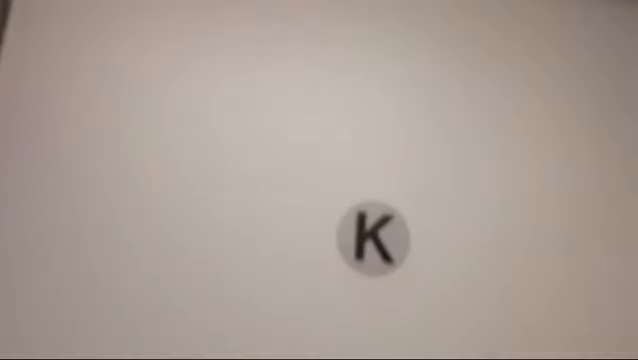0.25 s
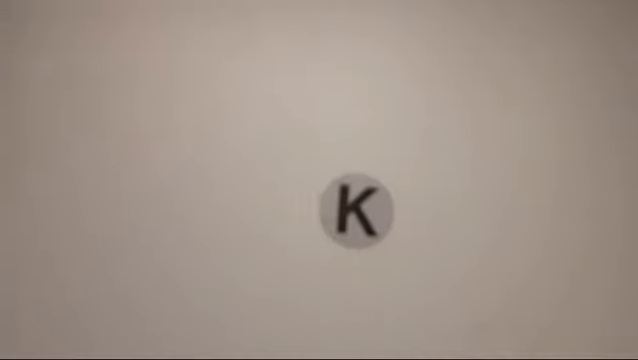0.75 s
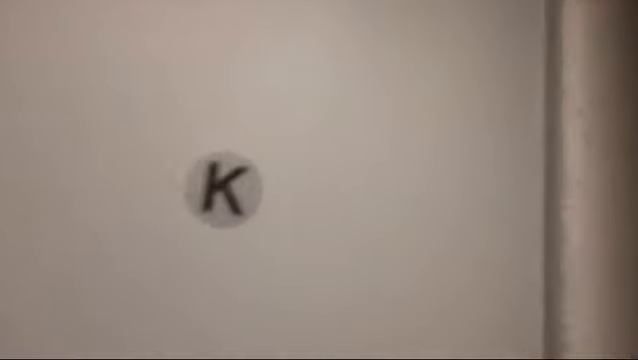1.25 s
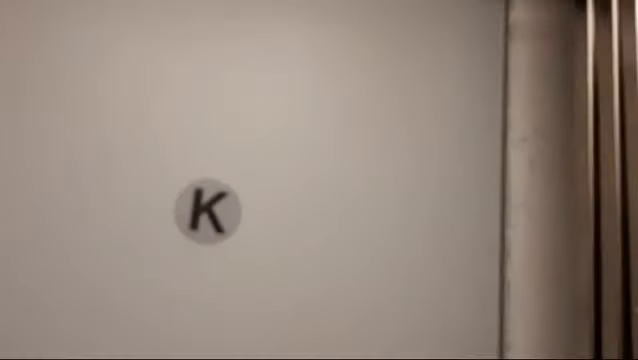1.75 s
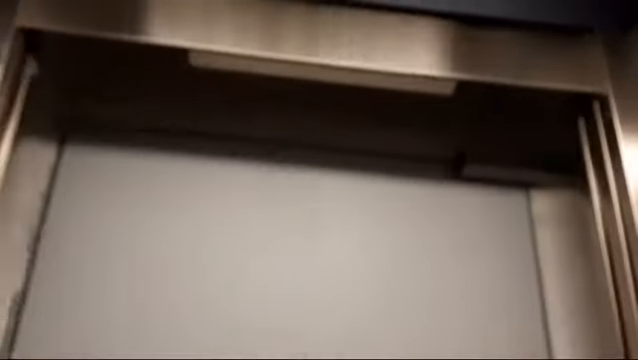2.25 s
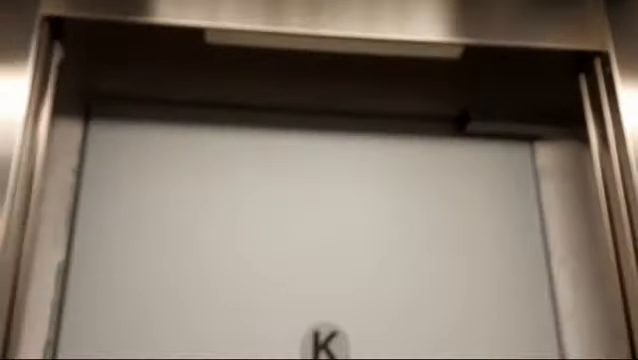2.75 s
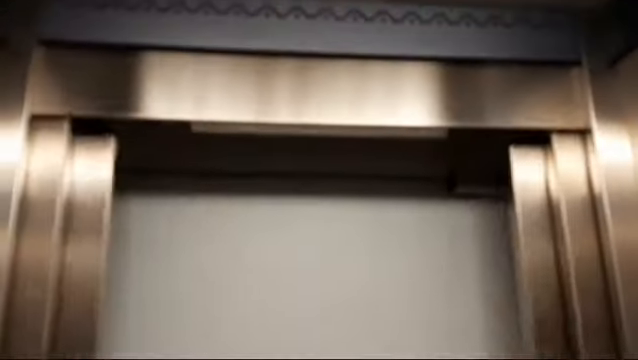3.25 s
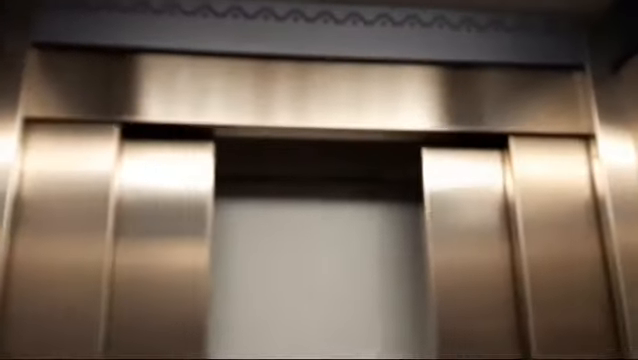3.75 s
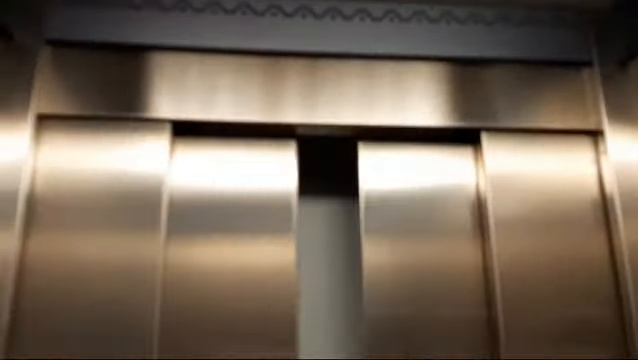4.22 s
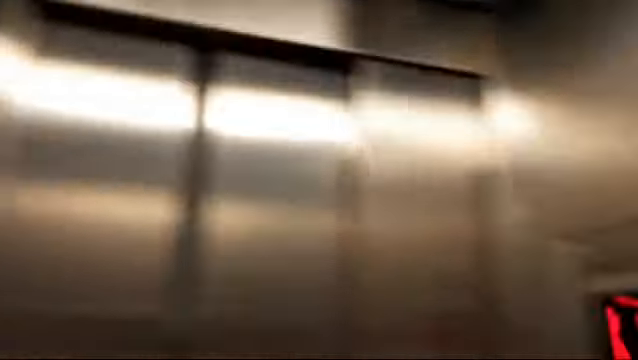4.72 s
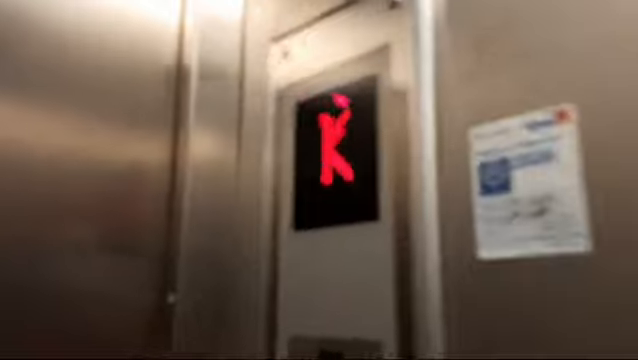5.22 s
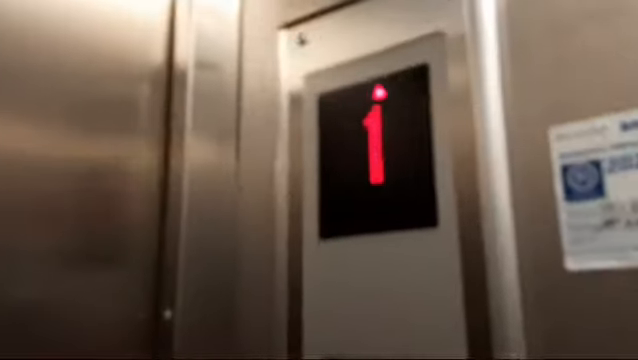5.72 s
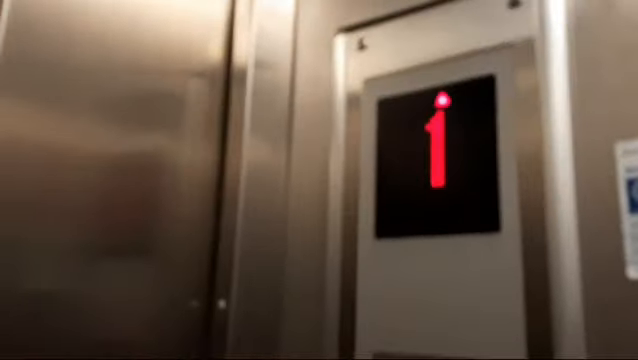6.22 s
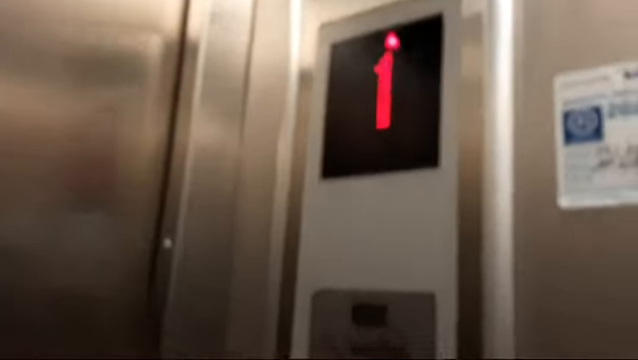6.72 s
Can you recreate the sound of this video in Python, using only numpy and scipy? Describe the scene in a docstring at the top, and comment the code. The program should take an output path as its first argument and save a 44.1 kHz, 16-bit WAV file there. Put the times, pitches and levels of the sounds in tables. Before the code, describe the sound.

Close cloth rustling and small handling taps sit over the steady air hum of a small elevator car. After a short squeak and several heavy thuds, the metal doors grind shut nearby with hollow knocks and little chirps. Low rumbling then surrounds the hand-held microphone as the car gets moving, with two latch clacks, the second louder and ringing, and a faint motor hum.

```python
"""Inside a small steel elevator car, on a hand-held device with two microphone ports 17 cm apart.
First the ventilation hums while, right at the microphone, sleeves rustle and fingers tick on the case.
A rubbing squeak and a run of thuds lead into the door drive; a step away, the sliding panels knock,
roll shut and meet. Then the car shudders all around, the hoist motor hums through the walls,
a latch clacks twice and the low running noise sets in."""
import sys
import numpy as np
from scipy import signal
from scipy.fft import rfft, irfft
from scipy.io import wavfile
from scipy.ndimage import uniform_filter1d

SR = 44100
rng = np.random.default_rng(int(sys.argv[2]) if len(sys.argv) > 2 else 0)


def master(y):
    """Save y as 16-bit WAV."""
    cut = np.clip(np.atleast_2d(y).T, -1, 1)
    pcm = np.round(cut * 32767)  # scale
    wavfile.write(sys.argv[1], SR, pcm.astype(np.int16))


N = 307818
TIME = np.arange(N) / SR
HZ = np.maximum(np.fft.rfftfreq(N, 1 / SR), 1)


def from_db(db):
    """Decibels to gain."""
    return 10 ** (np.asarray(db) / 20)


def rms_one(x):
    """Scale to unit power."""
    return x / np.sqrt(np.mean(x ** 2) + 1e-20)


def gains(rows):
    """One smoothed gain curve for each dB column, silent outside the rows."""
    s, *columns = np.transpose(rows)
    inside = (TIME > s[0] - .03) & (TIME < s[-1] + .03)
    return [uniform_filter1d(inside * from_db(np.interp(TIME, s, db)), size=441) for db in columns]


def swell(s, rise, fall, shape=1.72):
    """A rounded rise to 1 at time s, and a fall."""
    distance = np.abs(TIME - s) / np.where(TIME < s, rise, fall)
    return np.exp(-np.minimum(distance, 8) ** shape)


def swells(rows):
    """One gain curve for each dB column; overlapping swells add in power."""
    return np.sqrt(sum(np.outer(from_db(db), swell(s, rise, fall)) ** 2 for s, rise, fall, *db in rows))


def colour(points, resonances=()):
    """A spectrum through (Hz, dB) points with (Hz, width Hz, dB) peaks, rolled off at both ends."""
    hz, db = np.transpose(points)
    peaks = sum(lift / (1 + (2 * (HZ - centre) / width) ** 2) for centre, width, lift in resonances)
    roll_off = np.hypot(1, (0.68 * hz[0] / HZ) ** 4) * np.hypot(1, (0.5 * HZ / hz[-1]) ** 4)
    return from_db(np.interp(np.log(HZ), np.log(hz), db) + peaks) / roll_off


def flutter(rate_hz, depth_db):
    """A gain that wanders at random."""
    drift = irfft(rfft(rng.standard_normal(N)) / (1 + (HZ / rate_hz) ** 2), N)
    return from_db(depth_db * rms_one(drift))


def diffuse(shape, port_gap_m=0.17):
    """Noise that reaches the two ports from all walls: alike in the bass, unrelated in the treble."""
    alike = .997 * np.sinc(2 * HZ * port_gap_m / 343)
    mid, side = rfft(rng.standard_normal((2, N))) * shape
    mid, side = irfft(mid * np.sqrt(1 + alike), N), irfft(side * np.sqrt(1 - alike), N)
    return (mid + side * np.array([[1], [-1]])) / np.std(mid)


def pan(db):
    """Port gains for a level difference, left minus right."""
    sides = from_db(np.array([[db], [-db]]) / 2)
    return sides / sides.mean()


def clicks(times, levels_db):
    """One impulse for each contact."""
    out = np.zeros(N)
    out[(np.asarray(times) * SR).astype(int)] = from_db(levels_db)
    return out


def ring(force, hz, t60):
    """A unit impulse sets a sine of height 1 ringing."""
    r, w = from_db(-60 / (t60 * SR)), 2 * np.pi * hz / SR
    return signal.lfilter([0, np.sin(w)], [1, -2 * r * np.cos(w), r * r], force + 1e-18)


def burst(s, rise, t60):
    """The envelope of reflections that build up in the car, then die away."""
    age = np.maximum(TIME - s, 0)
    return np.minimum(age / rise, 1) * from_db(-60 * np.clip((age - rise) / t60, 0, 3))


# air in the still car: (frequency [Hz], level [dB])
AIR_COLOUR = [(27, -29), (38, -9.5), (56, -8.5), (78, -8), (120, -24.5), (190, -26), (280, -21.5),
              (560, -52), (1500, -34), (3200, -73), (5000, -34), (8000, -36.5), (12000, -35), (16000, -39)]
# resonances of the hum, shared by wall drone and brushing cloth: (frequency [Hz], width [Hz], lift [dB])
HUM_PEAKS = [(52, 13, 3.3), (237, 7.6, 11.2), (306.3, 14.7, 9.6), (1503, 98, 7.8), (2050, 55, 8.8)]
def ventilation(level_db=-57):
    """Room tone: steady ventilation hums all around the microphone."""
    return from_db(level_db) * diffuse(colour(AIR_COLOUR, HUM_PEAKS))


# strokes of cloth: (peak time [s], rise [s], fall [s], swish [dB], brush [dB])
SLEEVE_STROKES = [(.08, 0.24, 0.17, -50.5, -56.5), (.168, 0.017, 0.022, -45, -62),
                  (.57, 0.17, 0.18, -60, -71), (.92, 0.027, 0.079, -67, -69.5),
                  (1.22, 0.078, 0.046, -63.5, -77), (1.605, 0.039, 0.083, -50.5, -49),
                  (1.73, 0.046, 0.055, -42.5, -50.5), (1.8, 0.032, 0.038, -45.5, -48.5),
                  (1.915, 0.04, 0.036, -36, -45), (2.08, 0.41, 0.23, -52, -55.5),
                  (2.328, 0.054, 0.055, -35, -39.5), (4.72, 0.054, 0.15, -44, -50),
                  (4.9, 0.085, 0.086, -46, -55), (5.09, 0.18, 0.12, -47.5, -46.5),
                  (5.29, 0.028, 0.054, -43, -48.5), (5.49, 0.0097, 0.045, -35, -54),
                  (5.8, 0.43, .14, -55, -57.5), (6.14, 0.15, 0.12, -46.5, -51.5),
                  (6.92, 0.22, 0.32, -67, -63)]
# faint sliding that never stops: (time [s], level [dB])
SLEEVE_SLIDING = [(0, -63), (.82, -71), (1.35, -68), (1.55, -64.5), (2.5, -53), (4.55, -58.5),
                  (5.42, -63.5), (6.35, -64), (6.55, -61), (6.98, -57)]
# bright swish and dull brushing: (frequency [Hz], level [dB])
SWISH_COLOUR = [(1200, -13), (2500, -7), (4200, -2), (6000, -3.5), (8000, -5.5), (11000, -6),
                (16000, -16.5)]
BRUSH_COLOUR = [(150, -17), (350, -1.5), (700, 0), (1100, -1.5), (2000, -4), (3000, -5), (5000, -9)]
def sleeves(swish_db=1.0, brush_db=2.5, faint_brush_db=-11.0):
    """Cloth slides on cloth close to the microphone: a grainy swish and a duller brushing."""
    swish, brush = swells(SLEEVE_STROKES)
    faint, = gains(SLEEVE_SLIDING)
    swish = from_db(swish_db) * np.hypot(swish, faint)
    brush = from_db(brush_db) * np.hypot(brush, from_db(faint_brush_db) * faint)
    grain = diffuse(colour(SWISH_COLOUR)) * flutter(rate_hz=120, depth_db=1.0)
    return swish * grain + brush * diffuse(colour(BRUSH_COLOUR, HUM_PEAKS))


# shifts of the hand: (peak time [s], rise [s], fall [s], level [dB])
GRIP_SHIFTS = [(.04, .1, 0.15, -48), (.22, .07, 0.14, -49.5), (.62, 0.067, 0.036, -54.5)]
def grip():
    """Handling noise: the hand shifts on the case, a dull, lumpy rubbing, different at each port."""
    level, = swells(GRIP_SHIFTS)
    shape = colour([(60, 5), (150, 2), (300, 0.5), (500, -12), (1500, -17.5), (3000, -20.5)])
    rubbing = rms_one(irfft(rfft(rng.standard_normal((2, N))) * shape, N))
    return level * rubbing * flutter(rate_hz=34, depth_db=3.5) * pan(4.4)


# ticks of the case: (time [s], left minus right [dB], level [dB], brightness [dB per band])
CASE_TICKS = [(.043, -13, -44, -6), (.1676, 16, -37, 13), (.183, -11, -37.5, -3), (.214, 5, -38, -2),
              (.24, 10, -35, -6), (.2655, 9, -35, -1), (0.31, 7, -38, -2), (.352, -13, -47, -11),
              (.424, -22, -41, -4), (.626, 14, -33, 0.5), (.69, 12, -48, 6), (.741, 12, -41, 5.5),
              (1.0575, 25, -39, 0.5), (1.074, 12, -44, 0), (2.096, 8, -27, -1.5), (2.128, 7, -34, -5),
              (4.179, -4, -32, 4), (4.2917, -12, -24, 0), (4.443, -8, -40, 1)]
# bands of a tick: (low edge [Hz], high edge [Hz], level [dB])
TICK_BANDS = [(587, 1620, -4), (2540, 9600, 3.5), (7660, 13700, 0)]
def case_ticks(crackle=0.24, crackle_t60=0.011):
    """The case around the microphone creaks in dry ticks, each a snap and a trace of crackle."""
    out = np.zeros((2, N))
    age = TIME[:SR // 50]
    for s, side_db, db, bright_db in CASE_TICKS:
        force = (age == 0) + crackle * rng.standard_normal((2, len(age))) * from_db(-60 * age / crackle_t60)
        at = int(s * SR)
        for k, (low, high, band_db) in enumerate(TICK_BANDS):
            band = signal.butter(2, [low, high], "band", fs=SR, output="sos")
            tick = (-1) ** k * signal.sosfilt(band, force)   # alternating signs let adjacent bands add
            level = from_db(db + band_db + bright_db * (k - 1)) * pan(side_db)
            out[:, at:at + len(age)] += level * tick / np.abs(tick).max()
    return out


# fingertips on the case: (time [s], level [dB])
FINGER_TAPS = [(0.122, -37.5), (0.141, -42), (0.167, -33.5), (0.237, -45), (0.291, -42.5), (0.322, -40.5),
               (0.348, -39), (0.381, -38), (0.386, -43), (0.41, -37), (0.415, -42), (0.548, -41.5),
               (0.623, -46), (0.69, -39), (0.74, -32.5), (1.074, -40), (1.644, -28), (1.691, -29),
               (2.692, -32.5), (2.778, -32), (2.847, -41)]
def fingers(start_hz=680, end_hz=230, tap_s=0.0055):
    """Soft taps right beside the left port, each a brief falling blip."""
    progress = np.linspace(0, 1, int(tap_s * SR))
    hz = start_hz * (end_hz / start_hz) ** progress
    blip = -np.sin(2 * np.pi * np.cumsum(hz) / SR) * np.sin(np.pi * progress ** 0.81) ** 2
    return np.convolve(clicks(*np.transpose(FINGER_TAPS)), blip)[:N] * pan(26.0)


# the car sways on its ropes: (peak time [s], rise [s], fall [s], rumble [dB], drone [dB])
SHUDDERS = [(1.65, 0.046, .07, -41, -57), (2.02, 0.12, 0.29, -29, -36), (2.58, 0.042, 0.058, -56, -41),
            (2.9, 0.21, 0.23, -56, -38), (4.07, .08, 0.12, -30.5, -40.5), (4.78, .1, 0.22, -40.5, -52.5),
            (5.08, 0.064, 0.19, -38, -41.5), (5.52, 0.039, 0.088, -32, -41), (6.16, 0.048, 0.084, -66, -48)]
# deep rumble and wall drone: (frequency [Hz], level [dB])
RUMBLE_COLOUR = [(25, -37), (33, 5.5), (45, 1), (65, 9), (86, 2.5), (105, -6), (135, -10), (250, -38)]
DRONE_COLOUR = [(90, -33), (140, -13.5), (190, -1.5), (300, -5), (420, -5.5), (800, -23.5)]
def walls(rumble_db=-1.0, drone_db=-4.5):
    """The walls rumble and drone on every side, shaken by each shudder and by the moving doors."""
    rumble, drone = swells(SHUDDERS)
    rumble = from_db(rumble_db) * np.hypot(rumble, door_driven(-30, steepness=1))
    drone = from_db(drone_db) * np.hypot(drone, door_driven(-42.5, steepness=0.81))
    low = rumble * diffuse(colour(RUMBLE_COLOUR, [(87.5, 66, 5.3)]))
    return low + drone * diffuse(colour(DRONE_COLOUR, HUM_PEAKS)) * pan(1.0)


# slips of the squeak, each a step higher: (peak time [s], pitch [Hz], level [dB], octave level [dB])
SQUEAK_SLIPS = [(1.743, 5130, -49, -43), (1.806, 5600, -36, -43), (1.834, 5670, -36.5, -33),
                (1.874, 5740, -40, -42)]
def squeak(rise_s=0.026, fall_s=0.016, glide_hz_per_s=300, waver=.001, scratch_db=-14.0):
    """Stick-slip whistle: each slip glides up on the left, its octave on the right, fringed by scratch."""
    wobble = 1 + waver * np.log(flutter(rate_hz=400, depth_db=5.5))
    tone, level = 0, 0
    for s, hz, db, octave_db in SQUEAK_SLIPS:
        slip = swell(s, rise_s, fall_s)
        phase = 2 * np.pi * np.cumsum((hz + glide_hz_per_s * (TIME - s)) * wobble) / SR
        fundamental = from_db(db) * np.sin(phase) * pan(18.0)
        octave = from_db(octave_db) * np.sin(2 * phase) * pan(-10.0)
        tone += slip * (fundamental + octave)
        level += from_db(db) * slip
    scratch = from_db(scratch_db) * level * diffuse(colour([(5500, 0), (7500, 0)], [(5600, 350, 14)]))
    return np.sqrt(2) * tone * flutter(rate_hz=97, depth_db=2.8) + scratch


# blows on the frame: (time [s], level [dB], hardness [dB])
FRAME_THUDS = [(1.867, -17, -1.5), (1.981, -17.5, -1), (2.054, -20, -1), (2.115, -20, -3),
               (2.152, -26.5, -12), (3.441, -22.5, -14), (4.332, -29, -20), (4.494, -29, -8.5),
               (4.914, -33, -15), (5.479, -26, -6.5), (5.911, -27.5, -10), (6.146, -34, 1.5)]
# modes of the cabin: (frequency [Hz], level [dB], t60 [s])
CABIN_MODES = [(49.4, -13, 0.53), (86.5, 0, 0.18), (96, 3, 0.04), (146, -15.5, 0.09), (239.9, -14, 0.3),
               (301.6, -16, 0.18), (426, -16.5, 0.07), (595, -35, 0.09)]
def thuds(contact_hz=700, clatter_db=-17.0, clatter_t60=0.17):
    """Blows ring the cabin around the microphone; hard ones reach its upper modes and clatter the walls."""
    s, db, hard_db = np.transpose(FRAME_THUDS)
    boom = 0
    for hz, mode_db, t60 in CABIN_MODES:
        force = clicks(s, db + mode_db + hard_db * (hz > 140))
        swell_s = 0.0069 * 86 / hz   # lower modes take longer to swell
        boom += ring(force, hz, t60) - ring(force, hz, swell_s * np.log(1000))
    blows = sum(from_db(db + hard + clatter_db) * burst(s, 0.001, clatter_t60)
                for s, db, hard in FRAME_THUDS)
    clatter = blows * diffuse(colour([(170, 12), (330, -10), (600, 2), (1000, -8), (2500, -10)]))
    soft_contact = signal.butter(1, contact_hz, fs=SR, output="sos")
    return clatter + signal.sosfilt(soft_contact, -2 * boom)


# the doors set off, run and brake: (time [s], speed [dB re full speed])
DOOR_SPEED = [(2.45, -24), (2.56, -14), (2.8, -8), (3.0, -4), (3.4, 0), (4.1, -0.5), (4.35, -8),
              (4.48, -16), (4.68, -13.5)]
def door_driven(full_speed_db, steepness):
    """A gain that follows the speed of the doors by a power law."""
    speed, = gains(DOOR_SPEED)
    return from_db(full_speed_db) * np.maximum(speed, 0) ** steepness


# resonances of the steel door panels: (frequency [Hz], width [Hz], lift [dB])
PANEL_MODES = [(160, 41, 11.5), (330, 5.5, 1.5), (382, 7.1, 10.5), (434, 6.5, 8), (525.5, 7.5, 13.5),
               (660, 56, 9), (732, 8.3, 15), (765, 6.6, 9), (851, 32, 3.5), (1000, 15, 6), (1224, 16, 4.5),
               (1533, 23, 12.5), (2050, 15, 12.5)]
# grinding rollers and sliding guide shoes: (frequency [Hz], level [dB])
ROLLER_COLOUR = [(150, 5), (280, -7), (420, 1), (700, -5), (1000, 0.5), (1600, -2.5), (2300, -4.5),
                 (3300, -9.5), (6000, -22)]
SHOE_COLOUR = [(2500, -5), (3800, -2.5), (5200, -1.5), (7500, -3.5), (10500, -6), (13000, -6),
               (16000, -16.5)]
# tones of the door drive at full speed: (frequency [Hz], level [dB])
DRIVE_TONES = [(668, -56.5), (1240, -53.5)]
# the guide shoes bind and hiss louder: (peak time [s], rise [s], fall [s], level [dB])
SHOE_SCUFFS = [(2.7, .15, 0.047, -47), (3.08, 0.3, 0.24, -40), (3.63, 0.017, 0.018, -47),
               (4.185, 0.0083, 0.03, -39), (4.37, 0.023, 0.022, -51)]
def rolling_doors(whine_width_hz=24, scuff_treble_db=-6.5):
    """A step away, rollers grind through the panels, the drive whines and guide shoes hiss and scuff."""
    grind = door_driven(-41, steepness=0.85) * flutter(rate_hz=17, depth_db=2.0)
    grind = grind * diffuse(colour(ROLLER_COLOUR, PANEL_MODES))
    whine = sum(door_driven(db, steepness=1.4) * diffuse(1 / (1 + ((HZ - hz) / whine_width_hz) ** 2))
                for hz, db in DRIVE_TONES)
    hiss = door_driven(-48, steepness=1) * diffuse(colour(SHOE_COLOUR, [(12500, 5400, 2.9)]))
    binding, = swells(SHOE_SCUFFS)
    scuff = binding * diffuse(colour(SHOE_COLOUR, [(12500, 8000, scuff_treble_db)]))
    return grind + whine + hiss + scuff


# chirps of the door gear: (time [s], pitch [Hz], level [dB])
GEAR_CLINKS = [(2.556, 2380, -45.5), (2.96, 1960, -36.5), (3.218, 3880, -29), (3.332, 1820, -41.5),
               (3.503, 2045, -32.5), (3.503, 874, -37), (3.505, 6640, -40), (3.695, 2075, -31),
               (3.696, 2400, -35), (3.697, 2940, -36), (3.697, 4760, -44), (4.013, 1920, -38),
               (4.422, 1820, -49), (4.426, 2270, -49), (4.495, 2050, -48)]
def clinks(rise_s=0.0052, t60=0.14, rough_db=5.0):
    """Hangers and links at the doorway chirp briefly, each at its own pitch."""
    out = np.zeros((2, N))
    for port in out:
        wobble = np.log(flutter(rate_hz=120, depth_db=9.5))
        for s, hz, db in GEAR_CLINKS:
            span = slice(int(s * SR), int((s + 2 * t60) * SR))
            age = TIME[span] - TIME[span][0]
            level = np.minimum(age / rise_s, 1) * from_db(db - 60 * np.maximum(age - rise_s, 0) / t60)
            port[span] += level * np.sin(2 * np.pi * hz * age + wobble[span] + rng.uniform(0, 2 * np.pi))
        port *= flutter(rate_hz=91, depth_db=rough_db)
    return out


# knocks of the door panels: (time [s], low band [dB], middle band [dB], high band [dB])
PANEL_KNOCKS = [(2.561, -42.5, -45, -55), (2.961, -40, -31, -31.5), (2.98, -27, -45, -47),
                (2.999, -23, -24, -22), (3.013, -27.5, -49, -49), (3.122, -43, -31.5, -40),
                (3.165, -33, -32, -32), (3.219, -36.5, -49, -37), (3.507, -44, -37.5, -38),
                (3.696, -30.5, -30.5, -48), (4.017, -38, -35.5, -47), (4.165, -39.5, -59, -53),
                (4.305, -39.5, -38.5, -36), (5.856, -46, -44.5, -45)]
# those three bands: (low edge [Hz], high edge [Hz], t60 [s], level [dB])
KNOCK_BANDS = [(513, 740, 0.2, -4.5), (1160, 2270, 0.29, -3.5), (2800, 3750, 0.073, -4)]
def knocks(rise_s=0.0062, ring_db=-13.0, hardening=2.9):
    """The panels knock a little to the left: a crash that dies sooner in the treble, and a hollow ring."""
    out = 0
    for k, (low, high, t60, band_db) in enumerate(KNOCK_BANDS):
        blows = sum(from_db(db[k] + band_db) * burst(s, rise_s, t60) for s, *db in PANEL_KNOCKS)
        out += blows * diffuse(colour([(low, 0), (high, -2)], PANEL_MODES)) * pan(3.0 if k == 0 else 0.0)
    s, low_db, _, _ = np.transpose(PANEL_KNOCKS)
    blow_db = low_db.max() + hardening * (low_db - low_db.max())   # only hard blows ring the whole sheet
    for hz, width, mode_db in PANEL_MODES:
        arrival = s + rng.uniform(0.00203, 0.01187, len(s))   # bending waves reach each mode a bit later
        treble_loss_db = 6 * max(np.log2(hz / 800), 0)
        force = clicks(arrival, blow_db + 0.85 * mode_db + ring_db - treble_loss_db)
        out += ring(force, hz, t60=np.log(1000) / (np.pi * width)) * pan(5.8)
    return out


# the car gets under way: (time [s], pitch [Hz], hum [dB], boom [dB])
HOIST_RUN = [(5.2, 237.8, -60.5, -52), (5.6, 236.6, -62.5, -56), (6.2, 236, -66.5, -43),
             (6.45, 237, -76, -57), (6.66, 239.4, -66, -52), (6.77, 237.6, -59, -45.5),
             (6.98, 247, -52.5, -53)]
def hoist(waver=0.0045):
    """Heard through the walls, the hoist motor's hum dips, then swells, over a low boom of the cabin."""
    s, hz, _, _ = np.transpose(HOIST_RUN)
    hum_level, boom_level = gains(np.delete(HOIST_RUN, 1, axis=1))
    wobble = 1 + waver * np.log(flutter(rate_hz=20.5, depth_db=8.0))
    phase = 2 * np.pi * np.cumsum(np.interp(TIME, s, hz) * wobble) / SR
    hum = hum_level * np.sqrt(2) * np.sin(phase) * flutter(rate_hz=12, depth_db=3.5)
    return hum + boom_level * diffuse(colour([(80, 0), (95, 0)], [(85.7, 15.1, 22.6)]))


# latch and brake clacks: (time [s], clack [dB], ringing steel [dB], rise [s])
CLACKS = [(5.485, -48, -64, 0.012), (6.125, -26, -33, 0.0046)]
# spectrum of a clack: (frequency [Hz], level [dB])
CLACK_COLOUR = [(250, -14), (560, -6.5), (760, 4.5), (1000, -4), (1300, 2), (1550, 1.5), (1800, -5.5),
                (3700, -7.5), (4900, 2), (6000, -12), (7600, -10.5), (10000, -15), (16000, -27)]
# modes of the steel catch: (frequency [Hz], level [dB], t60 [s])
CATCH_MODES = [(3516, 0, 0.19), (4500, -0.5, .26), (4510, 1, 0.2), (4955, -1, 0.16), (5090, 4, 0.14)]
def latch(clack_t60=0.23):
    """A broad clack fills the car, and the steel catch rings on with its own strength at each port."""
    level = sum(from_db(db) * burst(s, rise, clack_t60) for s, db, _, rise in CLACKS)
    clack = level * diffuse(colour(CLACK_COLOUR))
    s, _, ring_db, _ = np.transpose(CLACKS)
    steel = np.zeros((2, N))
    for port in steel:
        for hz, db, t60 in CATCH_MODES:
            force = clicks(s + rng.uniform(0, 0.0065), ring_db + db + rng.normal(0, 1.7))
            port += ring(force, hz, t60)
    return clack + steel * pan(3.3)


def scene():
    """The car and its machinery all around; cloth and handling close up."""
    car = ventilation() + walls() + hoist() + thuds() + rolling_doors() + knocks() + clinks() + latch()
    return car + sleeves() + squeak() + grip() + fingers() + case_ticks()


# response of the microphone behind its ports: (frequency [Hz], gain [dB])
MICROPHONE_RESPONSE = [(20, -19), (33, -0.5), (7000, -0.5), (7900, -2), (8600, -14), (9600, -9.5),
                       (11500, -2.5), (16000, 1.5)]
def record(dry, cutoff_hz=16000):
    """The hand-held microphone: its ports notch the treble, and the top is cut."""
    coloured = irfft(rfft(dry) * colour(MICROPHONE_RESPONSE), N)
    return signal.sosfilt(signal.ellip(12, .1, 80, cutoff_hz, fs=SR, output="sos"), coloured)


dry = scene()
out = record(dry)
master(out)
```